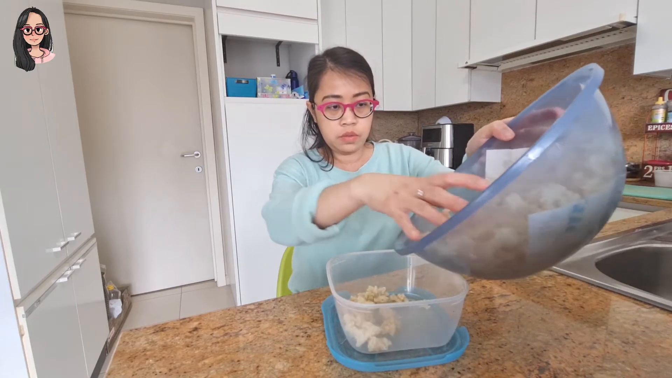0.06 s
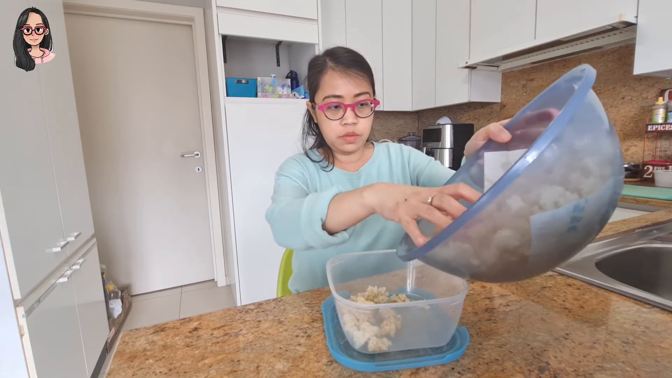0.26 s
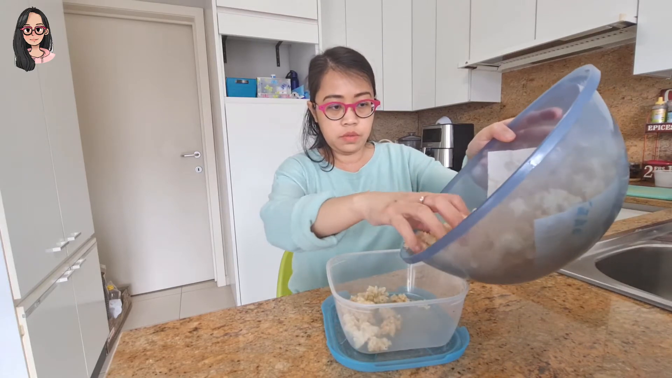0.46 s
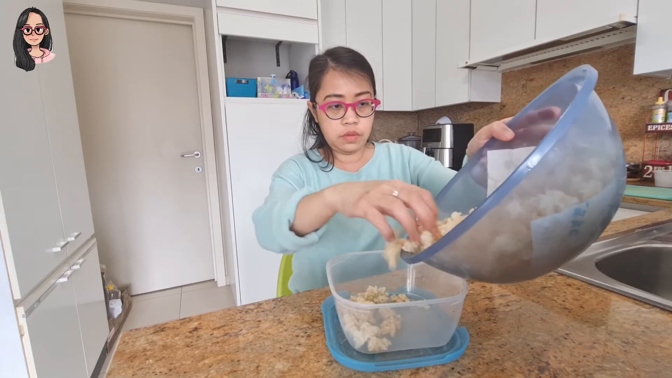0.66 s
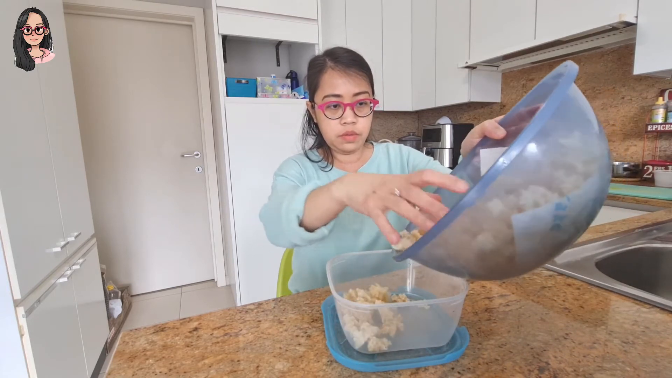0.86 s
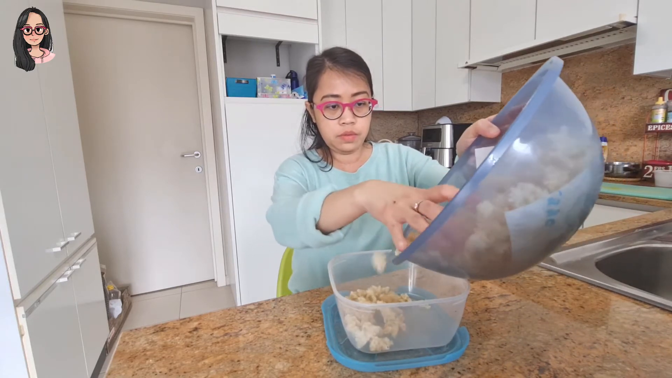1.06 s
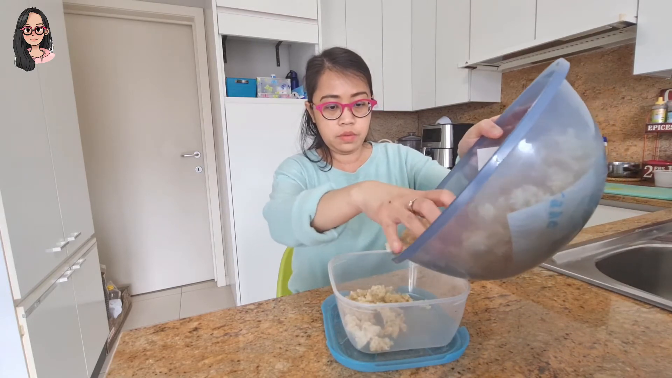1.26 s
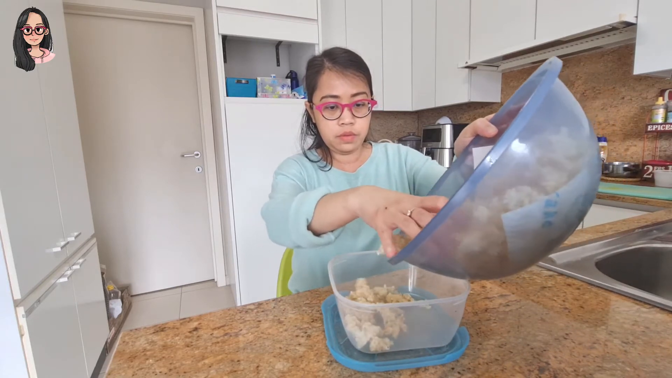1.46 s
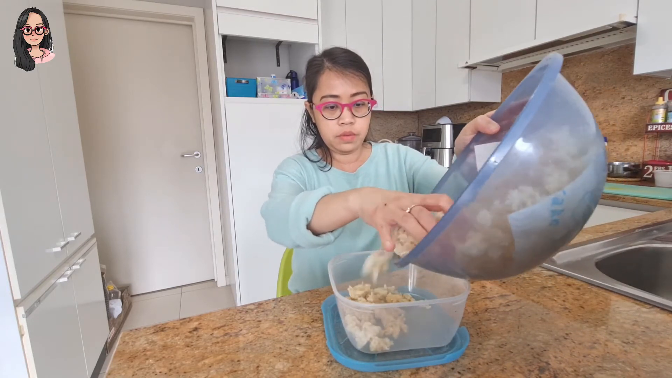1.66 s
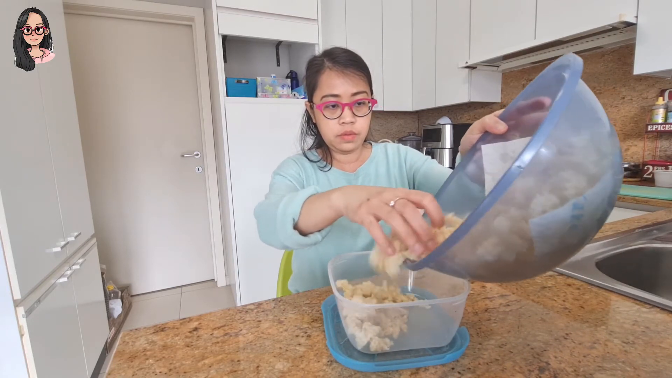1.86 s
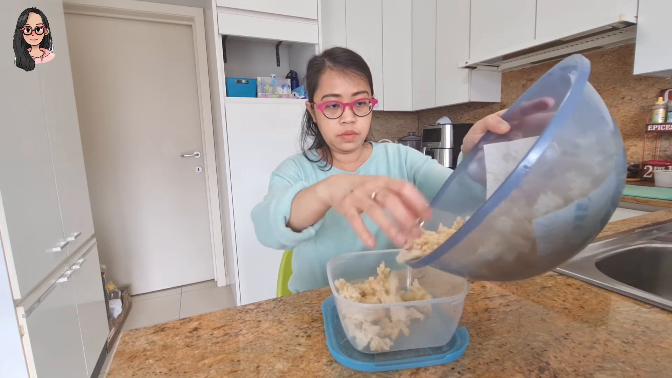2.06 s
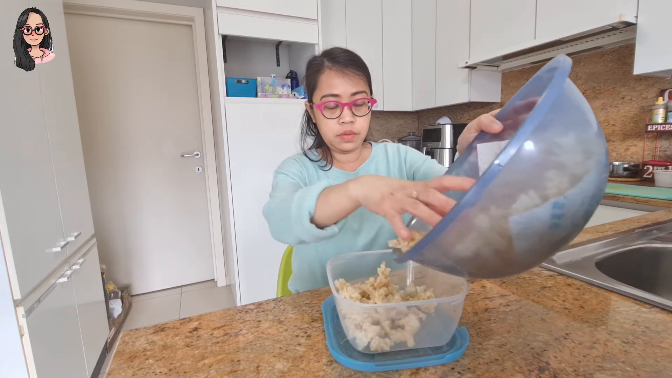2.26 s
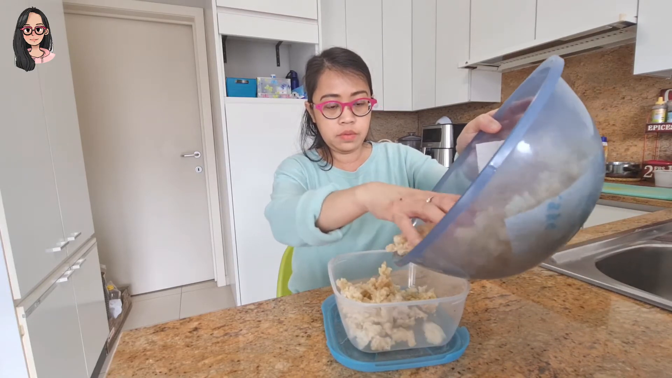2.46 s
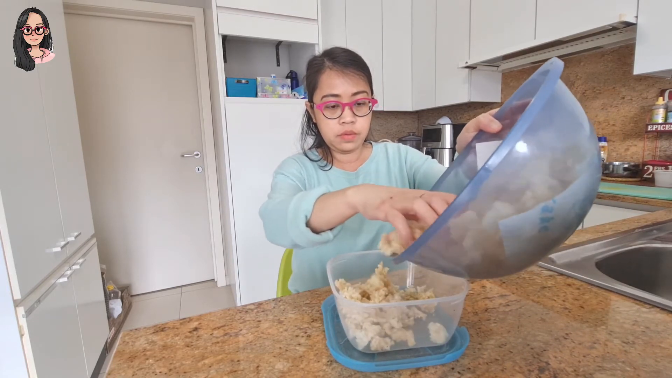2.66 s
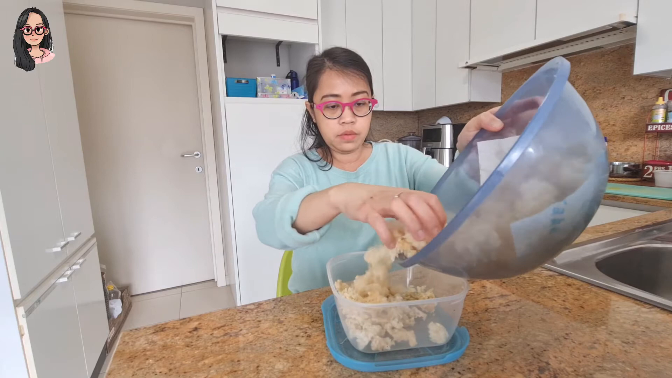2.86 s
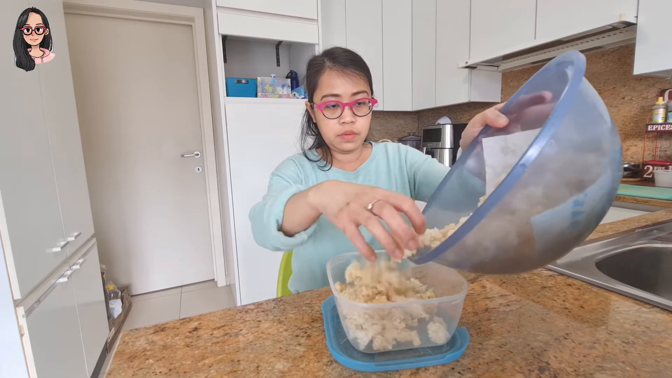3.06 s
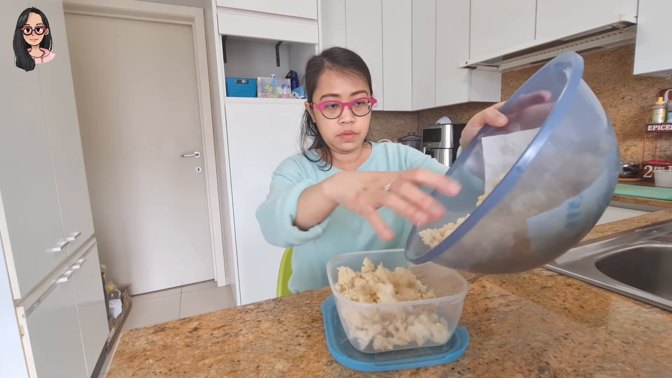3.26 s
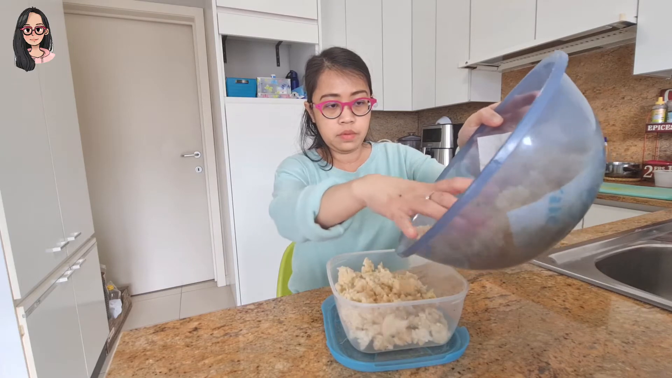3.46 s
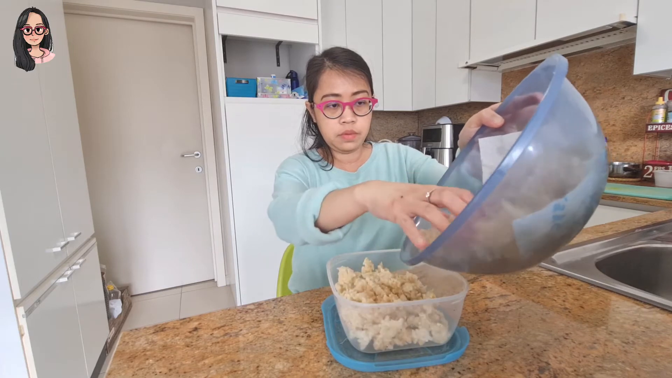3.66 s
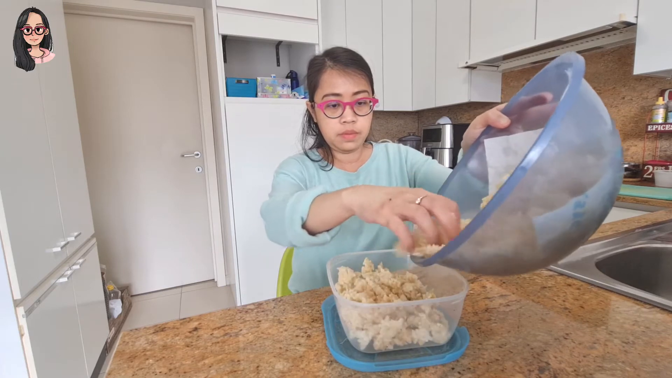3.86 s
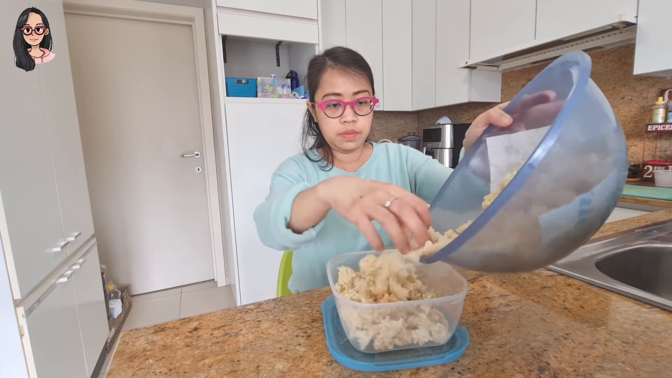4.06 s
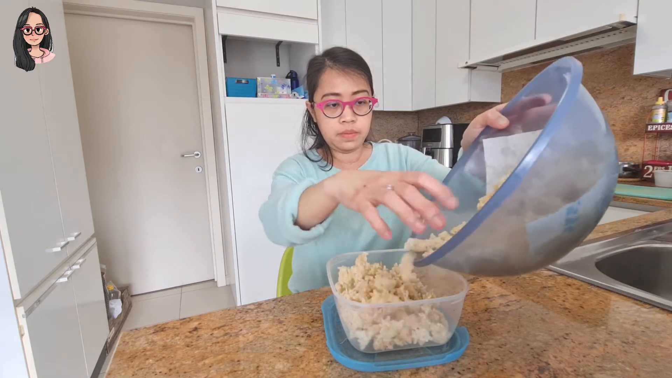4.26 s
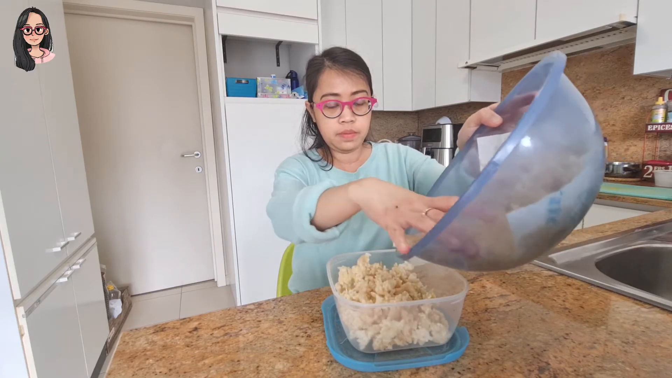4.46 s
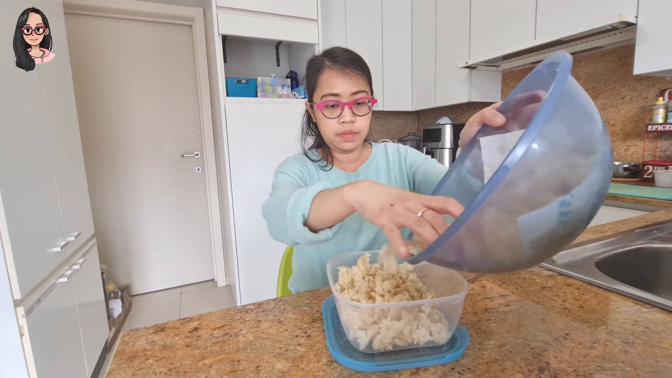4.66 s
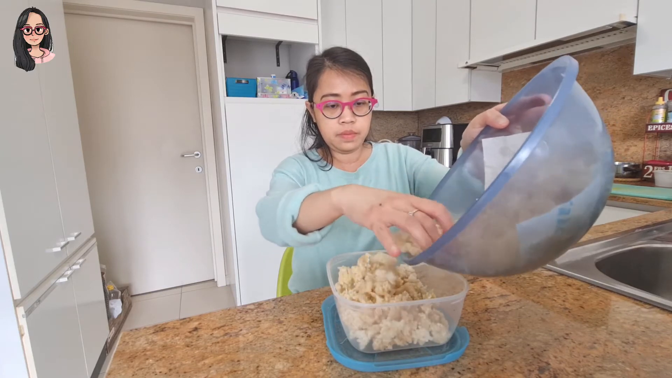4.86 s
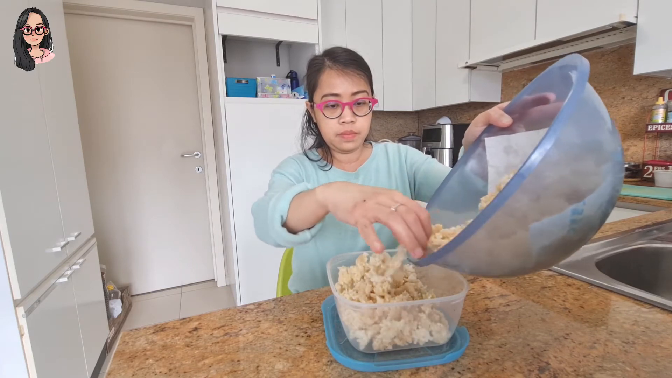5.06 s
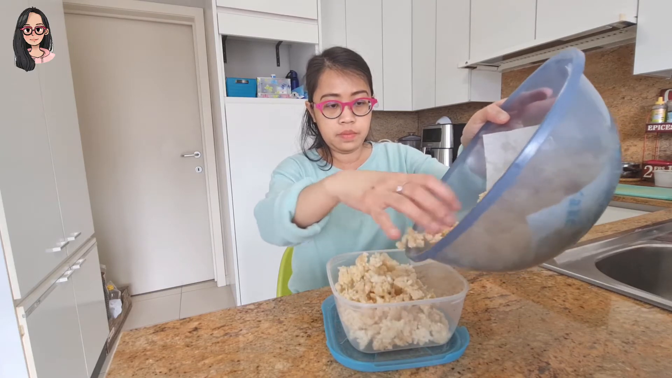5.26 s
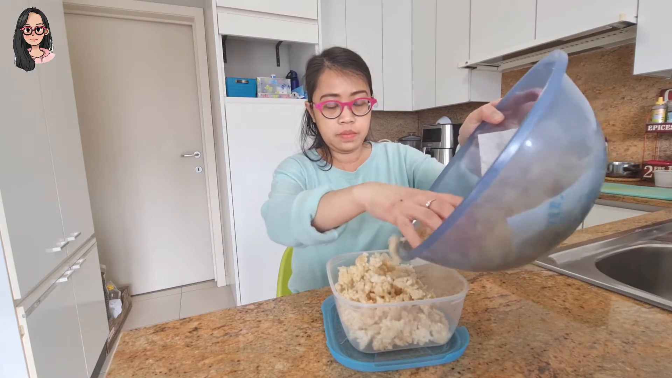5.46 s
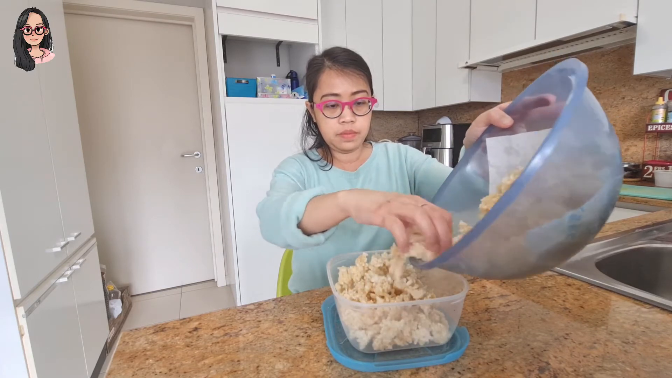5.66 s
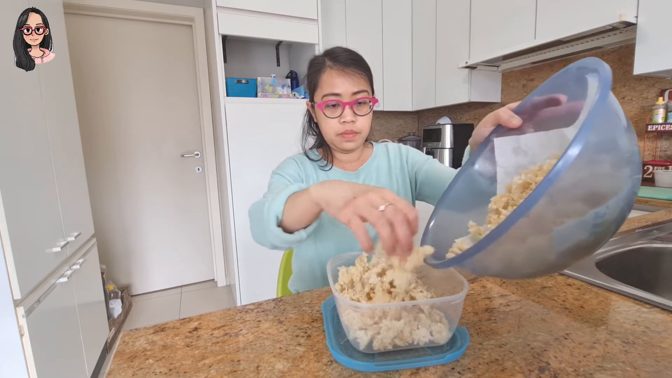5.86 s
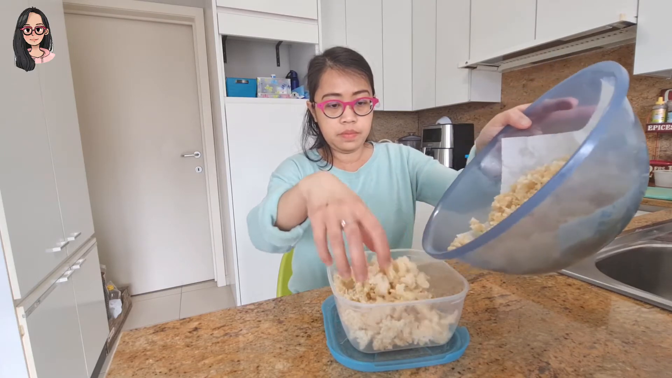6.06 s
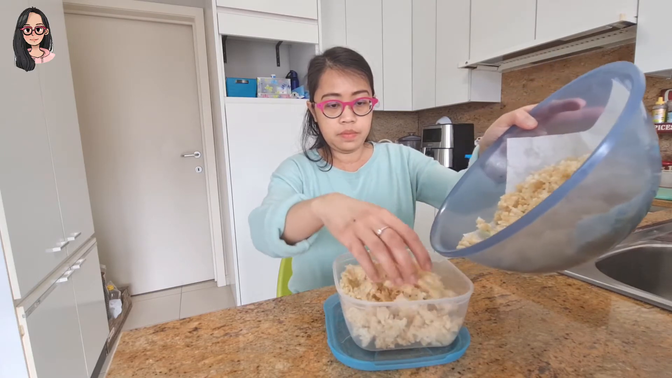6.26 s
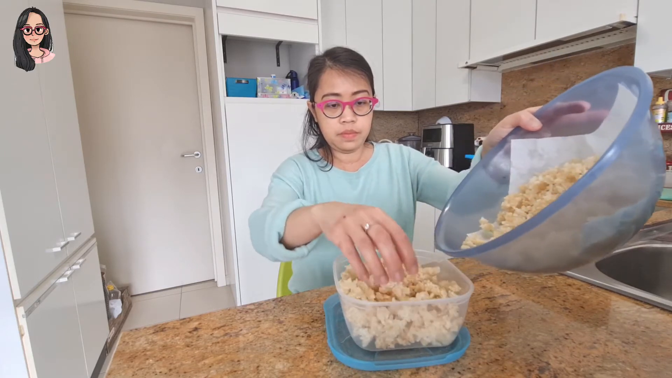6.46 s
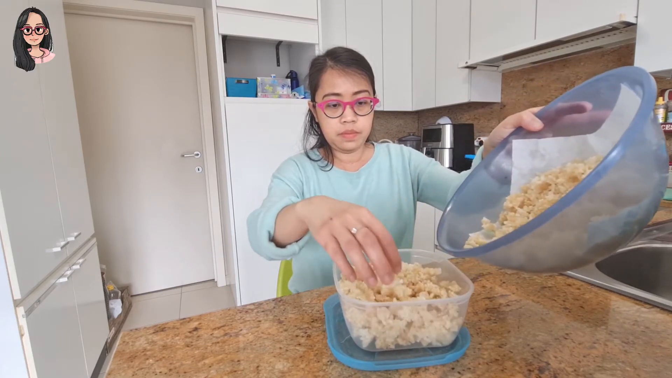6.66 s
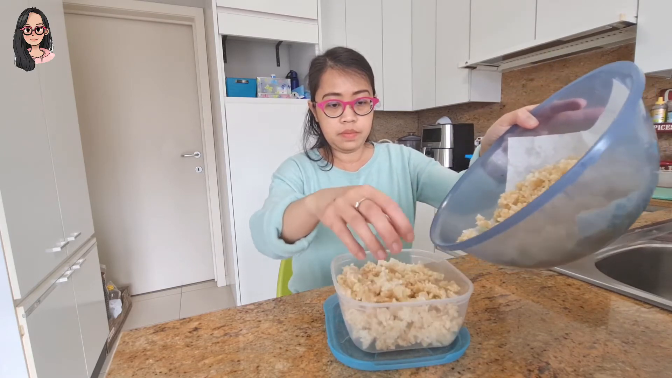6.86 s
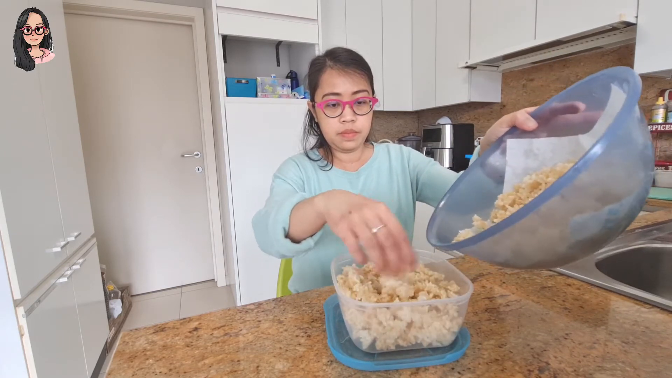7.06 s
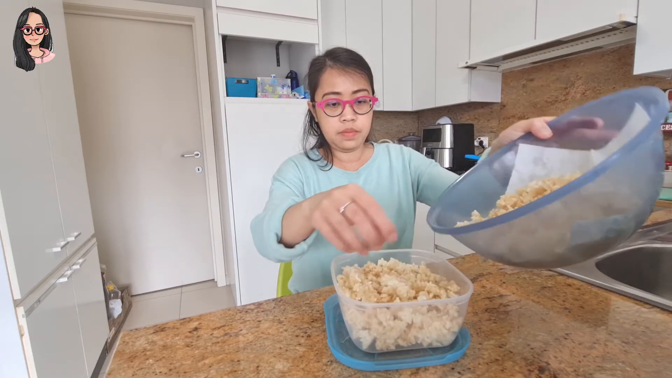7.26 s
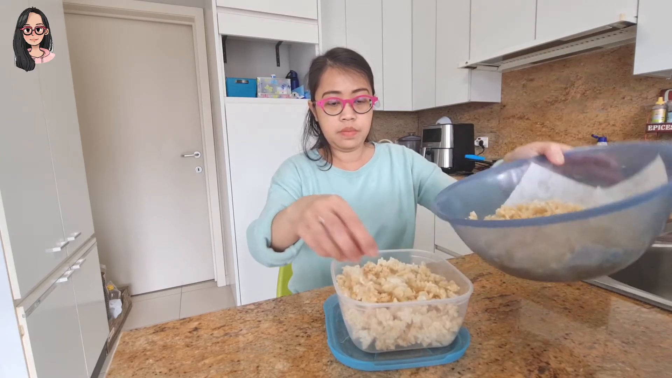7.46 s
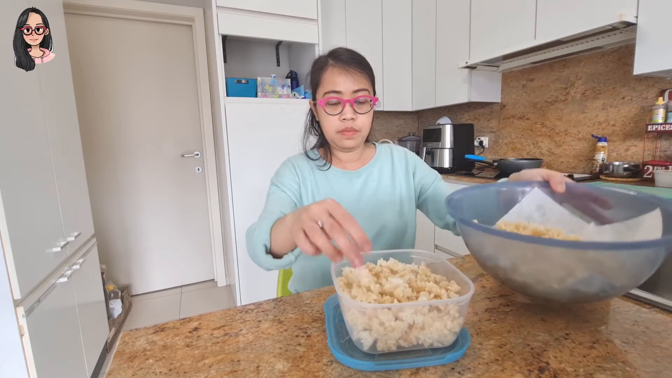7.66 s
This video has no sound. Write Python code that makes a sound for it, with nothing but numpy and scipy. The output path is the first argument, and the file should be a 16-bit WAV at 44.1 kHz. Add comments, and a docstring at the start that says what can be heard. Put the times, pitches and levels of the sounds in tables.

```python
"""Crackers raked into a plastic box

A kitchen counter, a metre from a small camera with two microphone ports. A hand rakes crisp fried
crackers from a tilted plastic bowl into a plastic box. Each collision is a short hollow knock with a
brittle tick; the box booms softly, the counter shakes, and the hard room answers over a faint hush."""
import sys
import numpy as np
from scipy import signal
from scipy.fft import rfft, irfft, next_fast_len
from scipy.io import wavfile
from scipy.ndimage import uniform_filter1d, map_coordinates

SR = 44100
rng = np.random.default_rng(int(sys.argv[2]) if len(sys.argv) > 2 else 0)


def pcm_store(signal):
    """Save signal as 16-bit PCM."""
    levels = np.round(np.clip(np.atleast_2d(signal), -1, 1) * 32767)
    wavfile.write(sys.argv[1], SR, levels.astype(np.int16).T)


N = 340452

# Collisions that stand out: start_s, knock_db, pitch_hz, tick_over_knock_db, boom_over_knock_db
LOUD_COLLISIONS = [(0.054, -23, 850, -11, -8), (0.124, -20, 930, -11, -11), (0.308, -16, 1420, -14.5, -6),
                   (0.385, -27.5, 1260, -11, -8), (0.461, -25.5, 1740, -13, -11),
                   (0.76, -20.5, 1770, -13, -18), (0.811, -15.5, 2350, -6, -21), (0.821, -28, 2000, 2, -18),
                   (0.845, -9.5, 1330, -3, -9), (0.854, -13, 1300, 6, -8), (0.889, -11, 1420, -9, -10),
                   (1.02, -29.5, 850, 7, -8), (1.148, -11.5, 2170, -8, -6), (1.214, -14, 1460, -13, -11),
                   (1.288, -15, 1730, -14, -10), (1.32, -18.5, 1600, -16, -12), (1.407, -18, 1190, -15, 1),
                   (1.47, -21, 1740, -21, -10), (1.518, -14.5, 1360, -12, -17), (1.544, -17, 1150, -7, -11),
                   (1.757, -12, 1740, -13, -12), (1.814, -12, 1410, -13.5, -15),
                   (1.832, -3.5, 1250, -7, -13), (1.847, -4, 1390, -7.5, -9), (1.899, -8, 1150, -11, -10),
                   (1.933, -6.5, 1310, -6, -16), (1.956, -7, 1270, -11.5, -6), (2.007, -3.5, 1270, -10, -7),
                   (2.032, -6, 1320, -11.5, -13), (2.057, 0, 1220, -11, -1), (2.068, -4, 860, -10, -11),
                   (2.131, -19.5, 853, -12, -6), (2.175, -5, 1240, -14, -11), (2.292, -19, 1160, -4, -13),
                   (2.31, -18, 1290, -6, -5), (2.382, -22, 1130, -20, -9), (2.469, -17, 800, -15, 4.5),
                   (2.521, -9, 2360, -11, -4), (2.855, -15.5, 1760, -4, -2), (2.889, -4.5, 1420, -7.5, -11),
                   (2.905, -3, 1100, -9, -13), (2.944, -2.5, 870, -20.5, 2), (3.002, -14, 1740, -4, -3),
                   (3.035, -11, 820, -13, 4), (3.058, -17.5, 1200, -4, -2), (3.085, -8, 1240, -15, -15),
                   (3.211, -30, 1400, -13, -8), (3.266, -10, 1170, -13, -11), (3.277, -17, 1250, -4, -17),
                   (3.289, -17, 1420, -7, -13), (3.325, -16, 1280, -14, -8), (3.347, -10, 1180, -12, -13),
                   (3.42, -4, 1420, -16, -8.5), (3.452, -15, 1260, -19, -9), (3.47, -9.5, 1000, -22, -6),
                   (3.534, -16, 1090, -16.5, -2), (3.595, -13, 1250, -20.5, -6),
                   (3.684, -13, 1290, -14, -8), (3.807, -10, 1200, 0, -8), (3.922, -12, 1760, -6, 2),
                   (4.035, -9, 1110, -20, -8), (4.062, -21, 1140, -11, -8), (4.095, -8, 1220, -7, -14),
                   (4.126, -8, 1170, -9.5, -9), (4.145, -5.5, 1150, -6, -4), (4.163, -11, 1170, -14.5, -8),
                   (4.201, -15, 1160, -15.5, -5), (4.228, -11, 1390, -2, -11),
                   (4.291, -11.5, 1260, -13.5, -11), (4.32, -12.5, 1280, -18, -7),
                   (4.341, -10, 1260, -10, -4), (4.417, -24, 1290, -4, -12), (4.443, -11, 1410, -4, -1.5),
                   (4.542, -13, 1810, -5, 4), (4.95, -10.5, 1200, -12, -9), (5.034, -15, 1120, -2, -8),
                   (5.141, -16, 1115, -7, -8), (5.215, -17.5, 1100, -4, -3), (5.24, -12, 1450, -18, -8),
                   (5.27, -11, 1130, -15.5, -4.5), (5.294, -12, 1270, -14, -8),
                   (5.362, -6.5, 1140, -16, -5.5), (5.422, -19, 1200, -16, -8), (5.604, -13, 1700, -5.5, 3),
                   (5.745, -10.5, 1740, -16.5, -8), (5.832, -14, 1750, -14, -14),
                   (5.915, -13.5, 1230, -8.5, 5), (5.985, -14, 1170, -12, -5), (6.036, -14, 1740, -13.5, 1),
                   (6.054, -2.5, 1120, -17.5, -4.5), (6.12, -11, 1170, -11, -12),
                   (6.131, -12, 1360, -9, -16), (6.146, -5, 2150, -5, -4), (6.156, -7, 1270, -13.5, -7),
                   (6.168, -12, 960, -12, -8), (6.276, -11.5, 1240, -7.5, -4),
                   (6.379, -14.5, 1010, -2.5, -8), (6.389, -15, 1110, -1, 0), (6.416, -17, 1150, -8, -3),
                   (6.483, -3.5, 1320, -17, -13), (6.532, -12.5, 1190, -7, -7),
                   (6.567, -16.5, 1320, -8, -12), (6.657, -34, 1180, -16, -12), (6.754, -18, 1380, -8, -4),
                   (6.832, -18, 1280, -13, -7.5), (7.136, -22.5, 1220, -13, -6),
                   (7.157, -10, 1330, -16, -9), (7.321, -27.5, 1010, -21.5, -7.5),
                   (7.467, -13.5, 1310, -13, -9.5), (7.677, -27, 1210, -6, -6),
                   (7.697, -16.5, 1130, -16, -9.5)]
# Sliding handfuls: start_s, swell_s, hold_s, knock_db, tick_over_knock_db, boom_over_knock_db
HANDFULS = [(0, 0.00067, 0.087, -31, -10.5, -25), (.16, .02, 0.23, -52, -6, -2),
            (0.296, .01, 0.48, -41, -14.5, -11), (0.838, 0.0037, 0.054, -28, -5.5, -14),
            (0.928, 0.31, .08, -30.5, -16, -8), (1.372, 0.011, 0.057, -37, -16.5, -12.5),
            (1.509, .01, 0.015, -28, -14.5, -9.5), (1.588, 0.16, 0.018, -27, -13.5, -11),
            (1.783, 0.011, 0.19, -24.5, -12, -15.5), (1.997, 0.0076, 0.095, -19.5, -8, -16),
            (2.123, 0.031, 0.056, -25.5, -17.5, -19.5), (2.271, 0.017, 0.028, -32.5, -14.5, -12),
            (2.368, .01, 0.049, -40, -9.5, -8), (2.441, 0.056, 0.092, -34, -8.5, -6.5),
            (2.59, 0.054, 0.66, -35.5, -10.5, -9.5), (2.871, 0.0037, 0.33, -25.5, -10, -13),
            (3.247, 0.017, 0.092, -25, -9, -13), (3.422, 0.0046, 0.078, -32.5, -18, -13.5),
            (3.52, 0.023, 0.15, -38, -10.5, -6), (3.66, 0.1, 0.3, -28.5, -11.5, -11),
            (4.076, 0.066, 0.087, -26.5, -11, -8), (4.248, 0.0093, 0.1, -33, -14, -13.5),
            (4.429, 0.0044, 0.013, -30.5, -18, -12.5), (4.504, 0.01, 0.064, -32, -10, -8.5),
            (4.612, .03, 0.2, -32, -10.5, -11), (4.735, 0.21, 0.084, -28, -12.5, -9.5),
            (5.088, .01, 0.19, -32.5, -17, -9), (5.368, .005, 0.15, -41, -19, -5),
            (5.498, 0.11, .15, -28, -13, -12.5), (5.789, .01, 0.26, -36, -6, -7.5),
            (6.082, 0.038, 0.053, -27.5, -7, -10), (6.18, 0.052, .06, -27, -11, -9.5),
            (6.346, 0.0045, 0.074, -31.5, -9.5, -13), (6.476, .005, 0.1, -35, -17.5, -19),
            (6.718, 0.037, 0.015, -30.5, -9.5, -11), (7.115, 0.026, 0.0067, -28.5, -13.5, -14.5),
            (7.456, 0.0084, 0.0097, -34.5, -15, -11), (7.671, 0.033, .1, -26.5, -16.5, -13.5)]
# Resonances of the plastic walls: centre_hz, width_hz, gain_db
WALL_MODES = [(801, 155, -4), (982, 102, 3), (1114, 203, 2.5), (1488, 473, 2), (1692, 154, 6),
              (2073, 616, 1.5), (3455, 480, -14.5), (3900, 230, -40)]
# Low resonances of the box on the counter: centre_hz, width_hz, gain_db
BOX_MODES = [(138, 39, -14), (240, 68.5, -6), (314.6, 61, 1), (400, 95, -1), (597, 122, 2)]
# Spectrum of a brittle tick: frequency_hz, gain_db
TICK_SPECTRUM = [(2060, 1.5), (3500, -8), (6910, -16.5), (7650, -8.5), (8740, -12), (11600, -9),
                 (14900, -10), (16000, -59.5)]
# The tone colour drifts slowly: time_s, mid_lift_db, presence_lift_db, treble_lift_db
COLOUR_DRIFT = [(0, 9, 2, -18), (0.399, -9.5, 4.5, 6.5), (0.901, 14.5, 4.5, -7.5), (1.3, 7, 5, 5.5),
                (2, 5, 5.5, -3.5), (2.7, 7, 3, -1), (4, 0, 1.5, -0.5), (5.5, 4, -2.5, 5), (6.2, 3.5, 2, -3),
                (7.72, 5.5, -4, 6)]
# Nudges to the counter: peak_time_s, peak_db
COUNTER_BUMPS = [(1.25, -55), (4.1, -55), (4.6, -55), (5.33, -38.5), (5.39, -37.5), (5.7, -57), (7.7, -57)]
# Reverberation time of the kitchen: frequency_hz, t60_s
ROOM_DECAY = [(150, 0.29), (500, 0.4), (1200, 0.42), (3000, 0.091), (8000, 0.16), (15000, 0.17)]
# Spectrum of the quiet kitchen: frequency_hz, relative_db
ROOM_TONE = [(15, -54), (25, -28), (84, -19), (153, 7), (293, 16), (373, -37.5), (1040, -36.5), (1260, -52),
             (16000, -59.5)]
# Phase between the microphone ports: frequency_hz, left_lead_rad
PORT_PHASE = [(400, 0), (1030, 4.5), (1290, 5), (2070, 6.5)]
# Balance of the ports: frequency_hz, left_over_right_db
PORT_BALANCE = [(60, -2), (180, -4.5), (550, -3.5), (1650, 1.5), (4970, -1.5), (15000, 0.5)]

KNOCK_FALL_DB_PER_S, TICK_FALL_DB_PER_S, BOOM_FALL_DB_PER_S = 182.5, 182, 144  # once a handful rests
BUMP_HZ, BUMP_RISE_S = 57, 0.035
BASS_CUT_HZ, TOP_HZ = 33, 15900


def loud_crackers():
    """Single crackers land hard enough to be heard one by one."""
    start_s, knock_db, pitch_hz, tick_over_db, boom_over_db = np.transpose(LOUD_COLLISIONS)
    sizes = amp(knock_db), amp(knock_db + tick_over_db), amp(knock_db + boom_over_db)
    contacts = collisions(start_s, pitch_hz, *sizes, cycles=1.88, tick_s=0.003, spread_s=.00004)
    return sum(ring_box(*contacts))


def sliding_crackers(count=6000):
    """A tumbling heap: thousands of small collisions, heard handful by handful."""
    when, strength, brittleness = rng.random((count, 3)).T
    start_s = when * N / SR
    size = amp(-3.8 * np.log(strength + .008))  # many weak, a few strong
    size *= amp(1.11 * map_coordinates(rng.standard_normal(120), [14 * start_s]))  # pieces slip in clumps
    pitch_hz = np.clip(1400 * np.exp(.5 * rng.standard_normal(count)), 500, 7000)
    knock, tick, push = collisions(start_s, pitch_hz, size, size * amp(21.0 * brittleness), size,
                                   cycles=1.82, tick_s=0.0055, spread_s=.00012)
    sizzle = 0.71 * rng.standard_normal((2, N))  # crumbs and fingers sliding, too fine to count
    layers = ring_box(knock, unit(tick) + sizzle, push)
    return sum(gain * unit(layer) for gain, layer in zip(handful_gains(), layers))


def handful_gains(block=32):
    """Gains of knock, tick and boom: each handful swells, holds, then dies away; their powers add."""
    start_s, swell_s, hold_s, knock_db, tick_over_db, boom_over_db = np.transpose(HANDFULS)[:, :, None]
    age_s = np.arange(0, N + block, block) / SR - start_s
    rise = np.clip(age_s / swell_s, 0, 1)
    rest_s = np.maximum(age_s - swell_s - hold_s, 0)
    levels_db = (knock_db - KNOCK_FALL_DB_PER_S * rest_s,
                 knock_db + tick_over_db - TICK_FALL_DB_PER_S * rest_s,
                 knock_db + boom_over_db - BOOM_FALL_DB_PER_S * rest_s)
    power = [np.sum((rise * amp(db)) ** 2, axis=0) for db in levels_db]
    return np.sqrt(np.repeat(power, block, axis=1)[:, :N])


def collisions(start_s, pitch_hz, knock_size, tick_size, push_size, cycles, tick_s, spread_s):
    """Knock, tick and push on the box at both ports; each piece lies in its own direction."""
    t = np.arange(320) / SR
    ring, bearing, polarity, pan = rng.standard_normal((len(start_s), 4)).T
    decay_s = (cycles * np.exp(0.27 * ring) / pitch_hz)[:, None]
    tone = np.sin(2 * np.pi * pitch_hz[:, None] * t) * np.exp(-t / decay_s)  # hard contact: no slow rise
    push = np.sign(polarity)[:, None] * np.exp(-t / 0.00076)
    ports = []
    for side in (.5, -.5):
        arrival_s = start_s + side * spread_s * bearing
        gain = amp(side * 3 * pan)
        # rough surfaces radiate differently each way
        grit = rng.standard_normal((len(start_s), len(t))) * np.exp(-t / tick_s)
        layers = (knock_size, tone + 0.61 * grit), (tick_size, grit), (push_size, push)
        ports.append([place(arrival_s, (gain * size)[:, None] * shape) for size, shape in layers])
    return np.swapaxes(ports, 0, 1)


def ring_box(knock, tick, push):
    """Knocks ring the plastic walls, ticks stay brittle, pushes make the box boom."""
    time_s, *lifts = np.transpose(COLOUR_DRIFT)
    mid_db, presence_db, treble_db = (np.interp(np.arange(N) / SR, time_s, db) for db in lifts)
    walls = resonances(WALL_MODES)
    band_pass = lambda hz: 1 / (1 + 1j * hz / 5000) ** 2 / (1 - 1j * 450 / (hz + 1)) ** 2
    knock = filtered(knock, lambda hz: (0.27 + walls(hz)) * band_pass(hz))
    knock = lift_band(knock, mid_db, 830, 1030)
    knock = lift_band(knock, presence_db, 2700, 4100)
    # ticks come from spots too small to radiate bass
    tick = filtered(tick, lambda hz: amp(curve(TICK_SPECTRUM, hz)) * low_cut(hz, 1800))
    tick = lift_band(tick, presence_db, 2600, 4500)
    tick = lift_band(tick, treble_db, 7600, 22000)
    return knock, tick, filtered(push, resonances(BOX_MODES))


def counter_rumble():
    """The counter under the camera shakes with the boom of the box and takes a few soft bumps."""
    slab = resonances([(57, 24, -3), (105, 130, -9)])
    boom_gain = uniform_filter1d(handful_gains()[2], size=4000)
    shake_gain = amp(-40.5) * boom_gain ** 0.52 + amp(-71.5)  # never quite at rest
    shake = shake_gain * unit(filtered(rng.standard_normal(N), slab))
    t = np.arange(6000) / SR
    peak_time_s, peak_db = np.transpose(COUNTER_BUMPS)
    thump = np.sin(2 * np.pi * BUMP_HZ * t) * (t / BUMP_RISE_S) * np.exp(1 - t / BUMP_RISE_S)
    return shake + place(peak_time_s - BUMP_RISE_S, amp(peak_db)[:, None] * thump)


def kitchen_reverb(source, parts=24, delay_samples=180):
    """Each frequency dies at its own speed; the tail changes as hands and bowl move."""
    room = np.zeros((2, N + 2 * SR))
    step = N // parts + 1
    for start in range(0, parts * step, step):
        hz, t, noise = signal.stft(rng.standard_normal((2, SR // 2)), SR, nperseg=256)
        decay = amp(-60 * t / curve(ROOM_DECAY, hz)[:, None])
        tail = signal.istft(diffuse(noise, hz[:, None]) * decay, SR, nperseg=256)[1]
        wet = signal.fftconvolve(source[:, start:start + step], tail / np.linalg.norm(tail[0]), axes=1)
        arrival = start + delay_samples
        room[:, arrival:arrival + wet.shape[1]] += wet
    return room[:, :N]


def room_tone():
    """The faint, steady, low hush of the kitchen."""
    hz = np.fft.rfftfreq(N, 1 / SR)
    noise = diffuse(rfft(rng.standard_normal((2, N))), hz)
    return amp(-61.0) * unit(irfft(noise * amp(curve(ROOM_TONE, hz)), N))


def diffuse(pair, hz):
    """Long waves reach both ports alike, short ones differ."""
    share = np.clip(1.5 - hz / 500, .3, .92)
    return np.array([pair[0], share * pair[0] + np.sqrt(1 - share ** 2) * pair[1]])


def amp(db):
    """Decibels to amplitude."""
    return 10 ** (np.asarray(db) / 20)


def unit(x):
    """x scaled to an RMS of one."""
    return x / np.sqrt(np.mean(x ** 2) + 1e-20)


def curve(points, hz):
    """Interpolates (frequency_hz, value) points on a log axis."""
    point_hz, values = np.transpose(points)
    return np.interp(np.log(hz + 1), np.log(point_hz + 1), values)


def filtered(x, response):
    """x through a complex frequency response."""
    size = next_fast_len(N + SR // 2)
    return irfft(rfft(x, size) * response(np.fft.rfftfreq(size, 1 / SR)), size)[..., :N]


def low_cut(hz, corner_hz, order=4):
    """Gain of a high-pass filter."""
    return 1 / (1 + (corner_hz / (hz + 1)) ** order)


def resonances(modes):
    """Causal response of a set of modes with alternating signs."""
    return lambda hz: sum((-1) ** k * amp(db) * 1j * hz * width / (centre ** 2 - hz ** 2 + 1j * hz * width)
                          for k, (centre, width, db) in enumerate(modes))


def lift_band(x, db, low_hz, high_hz):
    """Raises or lowers one band of x by a changing gain."""
    band = filtered(x, lambda hz: low_cut(hz, low_hz, order=8) / (1 + (hz / high_hz) ** 8))
    return x + (amp(db) - 1) * band


def place(start_s, shapes):
    """Adds each row of samples at its start time."""
    index = np.clip(np.round(start_s * SR).astype(int), 0, N)[:, None] + np.arange(shapes.shape[1])
    return np.bincount(index.ravel(), shapes.ravel(), N + shapes.shape[1] + 1)[:N]


def scene():
    """Crackers a metre away, the room around them; pieces deep in the heap are heard less directly."""
    heap, singles = sliding_crackers(), loud_crackers()
    room = kitchen_reverb(amp(-7.0) * heap[:1] + amp(-9.0) * singles[:1])
    rumble = counter_rumble() * amp([[-1.2], [1.2]])  # a little to the right
    return heap + singles + room + rumble + room_tone()


def record(dry):
    """The camera housing shades and phase-shifts the two ports; deep bass and top treble are cut."""
    side = np.array([[.5], [-.5]])
    ports = lambda hz: amp(side * curve(PORT_BALANCE, hz)) * np.exp(1j * side * curve(PORT_PHASE, hz))
    return filtered(dry, lambda hz: ports(hz) * low_cut(hz, BASS_CUT_HZ) * (hz < TOP_HZ))


dry = scene()
out = record(dry)
pcm_store(out)
```